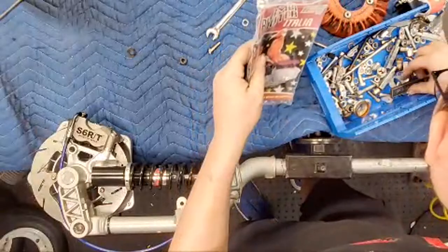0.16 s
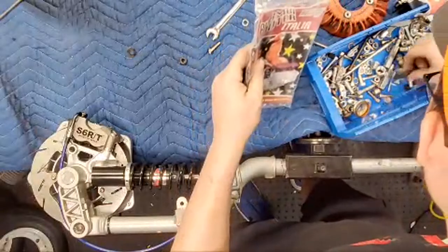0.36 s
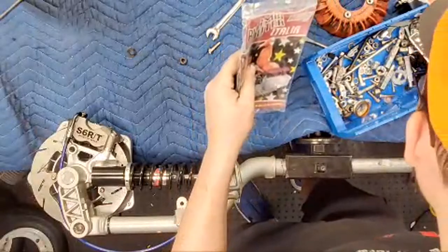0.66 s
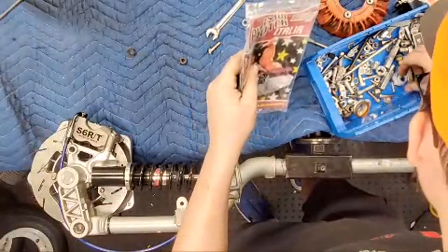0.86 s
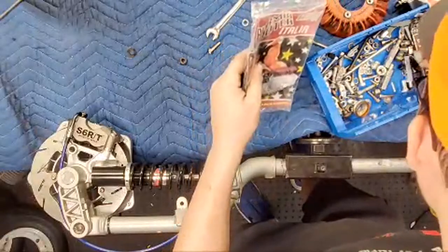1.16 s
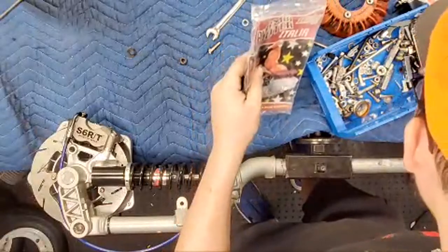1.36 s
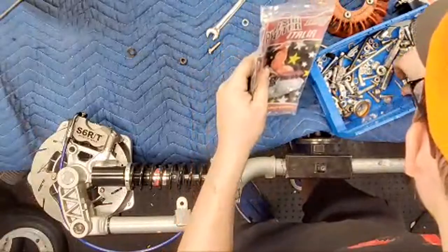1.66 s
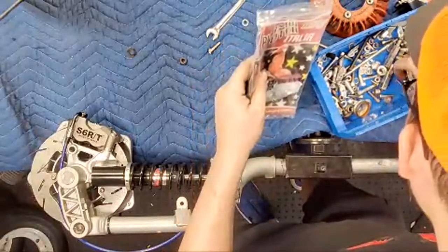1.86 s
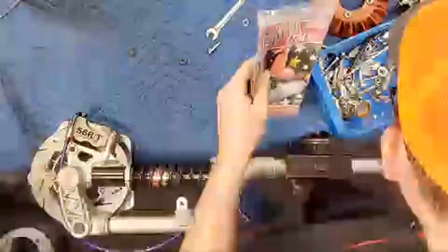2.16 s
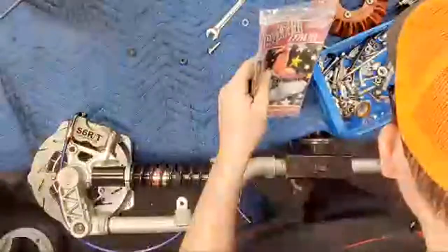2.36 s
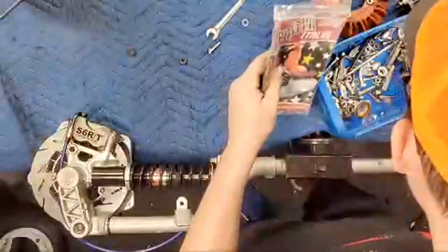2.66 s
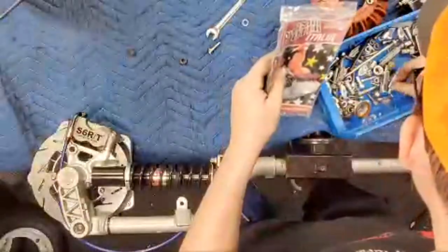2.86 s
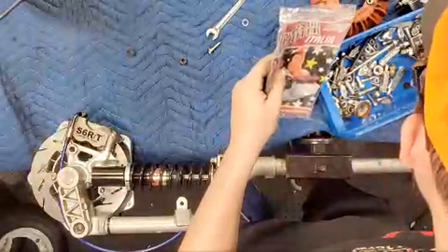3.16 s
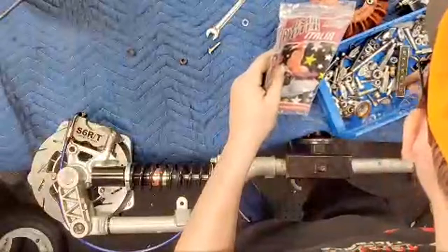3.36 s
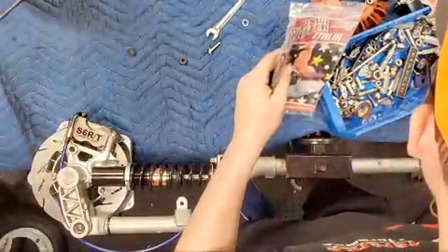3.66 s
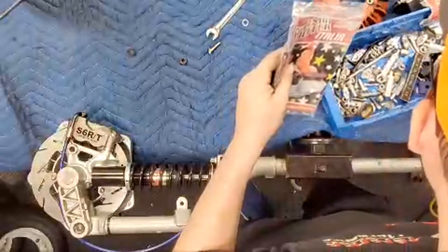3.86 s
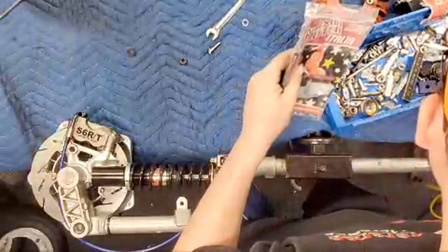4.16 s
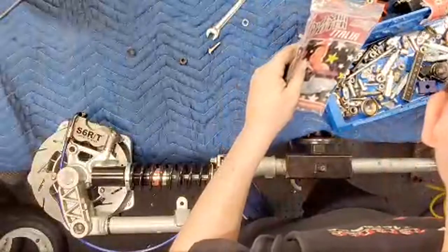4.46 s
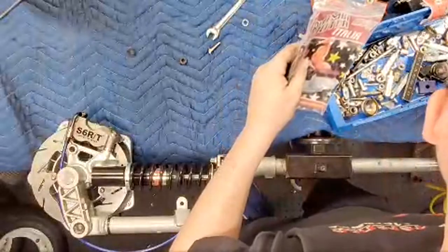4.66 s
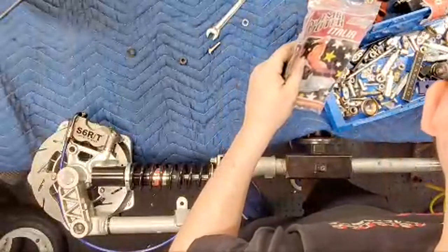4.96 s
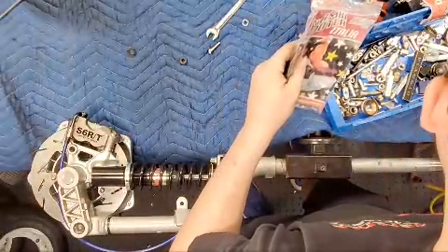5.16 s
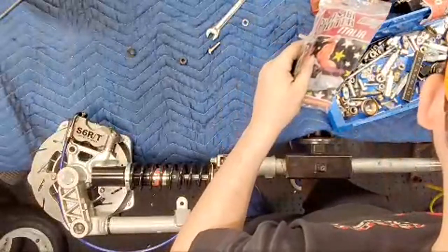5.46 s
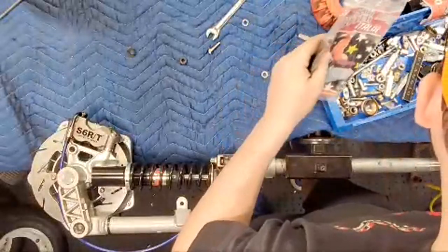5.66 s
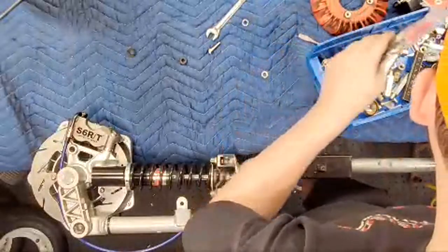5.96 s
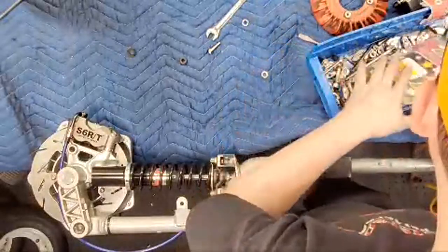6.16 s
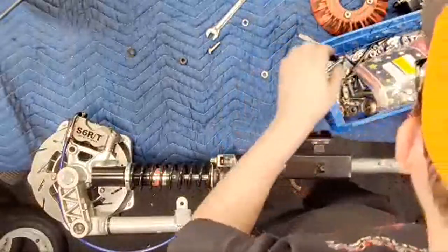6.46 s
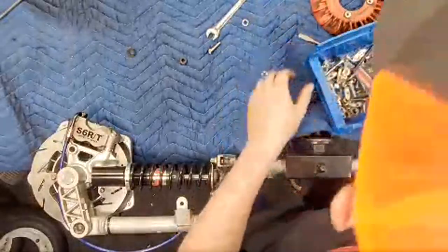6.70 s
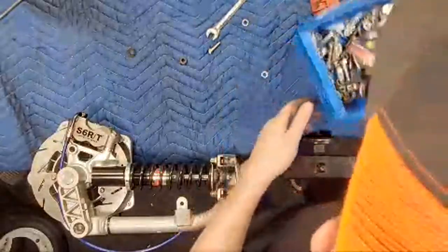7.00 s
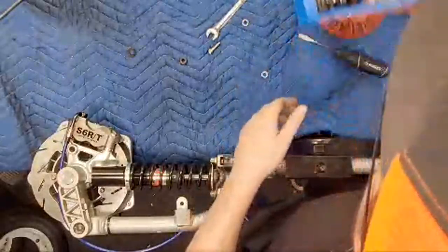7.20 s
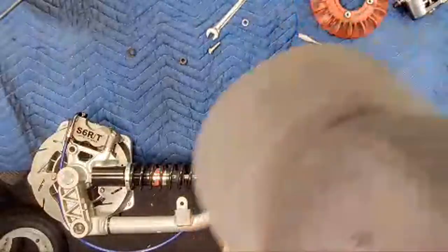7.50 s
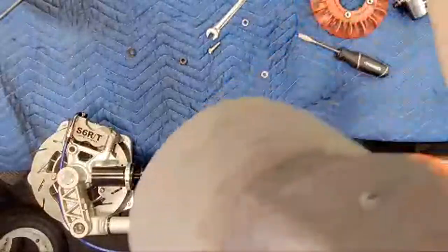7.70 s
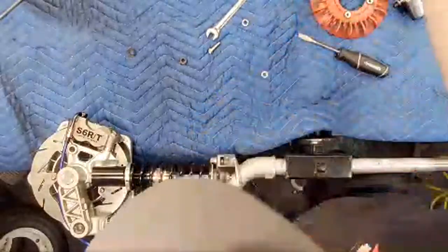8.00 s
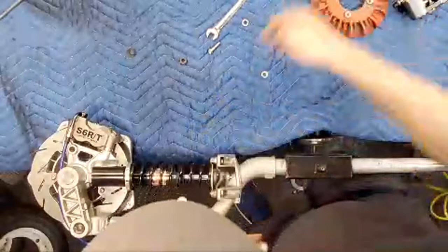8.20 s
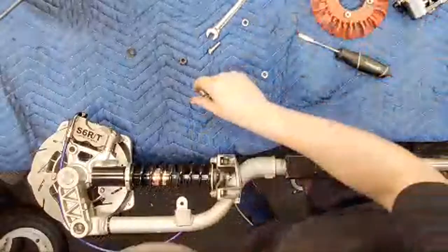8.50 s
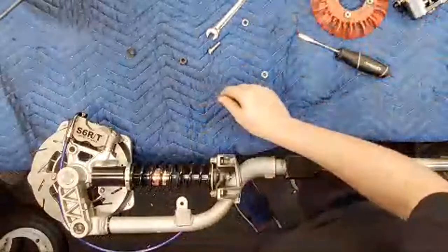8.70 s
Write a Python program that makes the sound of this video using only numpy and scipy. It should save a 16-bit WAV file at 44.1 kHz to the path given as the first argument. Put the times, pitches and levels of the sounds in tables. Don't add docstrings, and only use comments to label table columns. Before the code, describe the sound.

Close, dry sound of small steel hardware in a plastic tray on a padded bench, with faint low machine hum behind. A slide of parts starts, then fades sharply to silence at 0.3 s and snaps back near 0.6. Quick knocks and clinks cluster until 1.5, densest around 1.0-1.3. Digging follows from 1.7, with a hard jolt at 2.0 and strong clatter near 2.9. Raking is bright and busy at 3.1-3.3, with another heavy knock at 3.75 and a thin ring at 4.0. From 4.4 to 6.0 only soft ticks and light shuffles remain. A sharp clack lands at 6.13, then silence until 6.55; small rustles, another brief dropout around 7.0. From 7.4 the tray is moved: hollow, dense rattling grows from 7.7, with heavy jolts at 8.0 and 8.2, then falls quickly to quiet hum by 8.5, ending near 8.8.

```python
import sys
import numpy as np
from scipy import signal
from scipy.io import wavfile
from scipy.ndimage import uniform_filter1d

SR = 44100
rng = np.random.default_rng(int(sys.argv[2]) if len(sys.argv) > 2 else 0)


def gain_from_decibels(decibels):
    exponent = np.asarray(decibels, float) / 20
    return 10 ** exponent


def wrap_up_sound(samples):
    columns = np.atleast_2d(samples).T
    tamed = np.clip(columns, -1, 1)
    steps = np.round(tamed * 32767).astype(np.int16)
    wavfile.write(sys.argv[1], SR, steps)


N = 389844


def evened(x):
    return x / np.sqrt(np.mean(x ** 2) + 1e-20)


def read(points, hz):
    f, value = np.transpose(points)
    return np.interp(np.log(hz + 1), np.log(f + 1), value)


def add(mix, start_s, sound):
    part = mix[round(start_s * SR):][:len(sound)]
    part += sound[:len(part)]


def causal(gain):
    log = np.log(np.maximum(np.r_[gain, gain[-2:0:-1]], 1e-5))
    return np.fft.ifft(np.exp(log - 1j * signal.hilbert(log).imag)).real[:1024]


# pitch_hz, level_db (per Hz)
COLOUR = [(88, -45.5), (150, -15.5), (231, -3.5), (271, -19), (304, 2.5), (451, -1.5), (783, -4),
          (864, -14), (1280, -5), (4330, -18), (11400, -32.5), (15300, -35.5), (16500, -38)]
# low_hz, high_hz
BANDS_HZ = [(360, 1500), (1500, 5000), (5000, 30000)]


def voices():
    hz = np.fft.rfftfreq(2048, 1 / SR)
    gain = gain_from_decibels(read(COLOUR, hz))
    responses = []
    for low_hz, high_hz in BANDS_HZ:
        loss = np.sqrt((1 + (low_hz / (hz + 1)) ** 8) * (1 + (hz / high_hz) ** 8))
        response = causal(gain / loss)
        responses.append(response / np.linalg.norm(response))
    return responses


def impacts(count, per_s, spread_db):
    chance, size, sign = rng.random((count, 3)).T
    height = gain_from_decibels(-spread_db * np.log(np.maximum(size, .01)))
    return (chance < per_s / SR) * np.sign(sign - .5) * height


def mode(hz, t60_s, phase=0):
    t = np.arange(2000) / SR
    return gain_from_decibels(-60 * t / t60_s) * np.sin(2 * np.pi * (hz * t + phase))


def steel(count, low_hz, spread):
    pitch, life, phase = rng.random((count, 3, 1)).transpose(1, 0, 2)
    chink = mode(low_hz * spread ** pitch, .006 + .02 * life, phase).sum(0)
    return chink / np.linalg.norm(chink)


def layer_levels(thud_db, bright_db, clatter_db):
    return np.array([thud_db, thud_db + clatter_db + 0.56 * bright_db, thud_db + bright_db])


# start_s, tray_thud_db, brightness_db, tray_pitch_hz, clink_pitch_hz
PICKING = [(0.001, -21.5, -28.5, 640, 2020), (0.195, -30.5, -4, 764, 1930), (0.582, -25.5, -17, 584, 1950),
           (0.622, -26, -28, 550, 1590), (0.647, -33, -15, 1330, 2200), (0.718, -47, 15, 1340, 3030),
           (0.819, -36.5, -9.5, 1480, 2900), (0.927, -22, -17, 1370, 1600), (0.943, -29, 4, 740, 3300),
           (0.976, -32.5, 2, 579, 2950), (1.02, -15, -20, 1160, 2720), (1.061, -16.5, -9.5, 1020, 2020),
           (1.111, -10, -24, 610, 2270), (1.141, -14, -21, 1500, 1640), (1.161, -15.5, -14.5, 550, 1910),
           (1.198, -31, -23, 1270, 1970), (1.247, -27, -20, 1160, 1540), (1.28, -26, -13.5, 800, 1600),
           (1.301, -11.5, -31.5, 627, 2940), (1.349, -22.5, -14.5, 1440, 1870),
           (1.493, -29.5, -14, 1180, 1980)]
DIGGING = [(1.67, -28, -30, 740, 1760), (1.731, -40, -7.5, 762, 1790), (1.813, -29, -20, 413, 1600),
           (1.883, -24, -32.5, 1270, 1640), (1.926, -23.5, -25, 1310, 1880), (1.96, -39, 1, 1530, 1780),
           (2.015, -5.5, -11, 630, 2720), (2.171, -17, -22, 830, 2440), (2.205, -31, -18, 1200, 1650),
           (2.236, -29, -50, 1320, 1770), (2.296, -44, -7, 724, 3650), (2.422, -13.5, -19.5, 1393, 1580),
           (2.483, -21.5, -27.5, 1190, 1690), (2.511, -25.5, -10.5, 860, 2930),
           (2.544, -30, -45.5, 1480, 1690), (2.616, -24, -14, 550, 1930), (2.681, -31.5, 0, 730, 2030),
           (2.706, -22.5, -16.5, 1330, 2180), (2.751, -26, -23, 1280, 2430),
           (2.767, -21, -26.5, 1250, 2320), (2.795, -13, -15.5, 1100, 1750), (2.853, -22, -4.5, 594, 3440),
           (2.884, -4.5, -24, 414, 2340), (2.941, -19, -25, 590, 2400)]
RAKING = [(3.076, -40.5, -9, 455, 2500), (3.161, -13, -8.5, 780, 3470), (3.196, -19, -5.5, 424, 2940),
          (3.23, -11.5, -16.5, 594, 3660), (3.245, -16, -5, 527, 4570), (3.31, -23, -20.5, 620, 1887),
          (3.558, -30.5, -12, 571, 2160), (3.611, -27, -7.5, 330, 1700), (3.671, -39.5, 5.5, 1406, 2530),
          (3.749, -3.5, -17.5, 585, 2170), (3.791, -19.5, -10, 746, 1930), (3.813, -8, -4, 427, 3390),
          (3.824, -7, -3, 950, 4340), (3.918, -28, -7, 1000, 2190), (3.98, -34, -5, 1270, 3220)]
SORTING = [(4.428, -40.5, -4, 1300, 1680), (4.55, -42, 11.5, 660, 3280), (4.692, -42.5, -4, 560, 2140),
           (4.734, -32, -18.5, 627, 1930), (4.842, -33, -36, 1290, 1840), (5.146, -44, -0.5, 1240, 3530),
           (5.245, -33, 7, 1450, 3520), (5.299, -27, -45, 1300, 1660), (5.328, -36, 0.5, 1320, 3850),
           (5.388, -46, 11, 1390, 3420), (5.414, -32, -10, 725, 2000), (5.672, -32.5, -46, 660, 1700),
           (6.023, -59, 15.5, 450, 1850), (6.064, -47.5, 7.5, 750, 2620), (6.076, -47.5, 13.5, 900, 3510)]
CARRYING = [(6.138, -17.5, -12, 1060, 3410), (6.599, -34, -11.5, 1400, 2120),
            (6.819, -25.5, -22.5, 630, 3420), (6.912, -21, -17.5, 1074, 1860),
            (7.437, -28.5, -0.5, 640, 1750), (7.493, -24, -15.5, 530, 1780), (7.549, -21.5, -8, 448, 3530),
            (7.731, -24.5, -8.5, 439, 2050), (7.862, -15.5, -9, 448, 1980), (7.884, -17, -10.5, 410, 2000),
            (8.012, -4.5, -16.5, 1375, 1780), (8.032, -9, -7, 410, 2240), (8.149, -19.5, -12, 570, 1960),
            (8.218, -9.5, -4, 571, 2290), (8.519, -45.5, -5, 1900, 4900)]
# start_s, tray_thud_db,
# brightness_db, tray_pitch_hz, clink_pitch_hz
REBOUNDS = [(.596, -24.5, -19, 700, 1850), (0.628, -23.5, -10, 1300, 3400), (0.662, -32, -11, 1400, 3100),
            (0.708, -32, -13, 1300, 2000), (.796, -50, -6, 1400, 3030), (0.84, -39, -10, 1400, 1890),
            (.894, -62, -14, 1450, 2996), (0.986, -42, -5, 1500, 3050), (1.029, -13.5, -32, 1390, 1600),
            (1.084, -31, -6, 1300, 1890), (1.099, -28, -19, 1090, 2230), (1.15, -17.5, -14.5, 1300, 1670),
            (1.204, -27, -17, 1300, 2900), (1.238, -29, -28, 1220, 1700), (1.265, -25, -23, 920, 1600),
            (1.306, -30, -4, 685, 2100), (1.381, -40, -24, 1100, 1520), (2.813, -20, -6.5, 800, 3900),
            (2.827, -18, -14, 800, 3620), (2.879, -28, -32, 560, 1700), (2.9, -20.5, -9, 520, 2520),
            (6.127, -18, -7.5, 1040, 2240), (6.123, -24, -10, 1056, 2000), (7.709, -29, -11, 1280, 2000),
            (7.753, -23, -6.5, 500, 1900), (7.86, -24, -9, 460, 1900), (7.877, -17, -24, 480, 4300),
            (7.918, -18, -22, 500, 1190), (7.977, -30.5, -20, 1120, 2000), (8.004, -22, -17.5, 700, 1400),
            (8.077, -8, -28, 566, 1480), (8.2, -25.5, -0.5, 400, 1870), (8.209, -23, -15.5, 503, 2200),
            (8.47, -49, -7.5, 900, 2000), (8.615, -60.5, -9, 1200, 1780),
            (.179, -34.5, -15.5, 900, 1900), (3.594, -26.5, -19, 650, 1900), (3.645, -25.5, -26, 330.4, 1900),
         (3.689, -23, -17, 342, 2000), (3.758, -11, -15.5, 597, 1900), (4.386, -56, 2.5, 1400, 3200),
         (4.455, -53.5, 9.5, 1404, 3500), (6.168, -32.5, -9, 900, 3220), (.59, -27.5, -11, 1300, 2500),
         (2.043, -29, -8, 700, 4500), (2.082, -30, -27, 1300, 2400), (2.228, -35, -23, 1100, 2000),
         (2.241, -37, -17, 1200, 3500), (2.418, -31.5, -18.5, 1300, 2900),
         (2.477, -27.5, -20.5, 1404, 2900), (2.56, -39.5, -26, 1300, 2000), (2.574, -40, -22.5, 1200, 3000),
         (2.654, -39, -14.5, 1190, 3500), (2.67, -31, -19, 1300, 2500), (3.156, -39.5, -11.5, 1100, 3500),
         (3.186, -20.5, -12, 700, 1500), (3.203, -13.5, -7.5, 597, 4300), (3.228, -17, -10, 705, 3400),
         (3.254, -6, -10, 562, 1500), (3.26, -21, -12.5, 900, 2500), (3.272, -20.5, -15.5, 600, 2800),
         (3.33, -31.5, -19, 704, 1500), (7.77, -16.5, -12.5, 1475, 1900), (7.8, -27, -21, 518, 1900),
         (7.82, -27.5, -19.5, 520, 2100), (7.835, -14.5, -20, 503, 2200), (7.998, -17.5, -33.5, 300, 1600),
         (8.295, -16, -18, 500, 2000), (.646, -30.5, -13, 700, 2600), (.987, -43, -4, 1600, 3060),
         (4.636, -41.5, -5, 1600, 2000), (4.654, -40.5, -10, 1500, 2200), (4.766, -37.5, -11, 650, 1800),
         (8.718, -70, 6.5, 1500, 4800)]
# start_s, level_db
TICKS = [
    (4.363, -55),
    (6.7496, -44),
    (7.1612, -51),
    (7.244, -53),
]


def knock(levels_db, tray_hz, clink_hz, responses, longest_s):
    thud_db, clatter_db, fizz_db = levels_db
    t = np.arange(5000) / SR
    t60_s = np.clip(0.042 + 0.00016 * clatter_db, .01, longest_s)
    blows = impacts(len(t), 1800, 4.04) * np.minimum(t / 0.0052, 1) * gain_from_decibels(-60 * (t / t60_s) ** 1.57)
    rubbed = blows.copy()
    blows[90] += 3.5
    rubbed[90] += 1.5
    tones = [mode(tray_hz, .018), mode(clink_hz, .013), steel(count=14, low_hz=4500, spread=3.0)]
    strikes = [blows, blows, rubbed] * 2
    layers = [signal.fftconvolve(b[:2600], r)[:3600] for b, r in zip(strikes, responses + tones)]
    layers = [x / np.sqrt(uniform_filter1d(x ** 2, 200).max()) for x in layers]
    thud, clatter, fizz, tone, clink, chink = layers
    tray = gain_from_decibels(thud_db - 2) * (gain_from_decibels(-4) * thud + gain_from_decibels(-9.5) * tone)
    parts = gain_from_decibels(clatter_db) * (gain_from_decibels(-8) * clatter + gain_from_decibels(-11.0) * clink)
    whole = tray + parts + gain_from_decibels(fizz_db + 3.5) * (gain_from_decibels(-7.0) * fizz + gain_from_decibels(-13.5) * chink)
    return signal.lfilter(*signal.butter(4, .72 * tray_hz, "high", fs=SR), whole)


# peak_s, rise_s, fall_s, tray_rumble_db,
# brightness_db
STROKES = [(0.0, 0.023, 0.18, -39, -5), (0.284, 0.11, 0.69, -19.5, -14.5), (.6, 0.024, 0.14, -29, -12.5),
           (.725, 0.11, 0.055, -37.5, -4.5), (1.1, 0.15, 0.37, -30.5, -14.5),
           (1.941, 0.098, 0.056, -29.5, -13.5), (2.039, 0.069, 0.29, -28.5, -11.5),
           (2.78, 0.028, 0.049, -27, -13.5), (2.691, 0.077, 0.077, -34.5, -11),
           (2.861, 0.14, 0.18, -18.5, -12.5), (3.241, 0.15, 0.16, -17, -10.5),
           (3.67, 0.32, 0.29, -39, -0.5), (3.832, 0.23, 0.18, -18.5, -13.5), (4.565, 0.19, 0.18, -41, 4),
           (4.751, 0.088, 0.22, -42, -12.5), (5.259, 0.052, 0.32, -38.5, -1.5),
           (5.599, 0.13, 0.23, -45.5, 3.5), (6.171, 0.17, 0.53, -40, 2), (6.569, 0.068, 0.18, -42.5, -8),
           (6.83, 0.14, 0.23, -39, 2.5), (7.4, 0.15, 0.31, -31, -6), (7.559, 0.29, 0.11, -32, -16),
           (7.86, 0.26, 0.29, -23.5, -9), (8.046, 0.065, 0.15, -19, -3), (8.236, 0.082, 0.19, -17, -7),
           (.1, 0.29, 0.15, -61, 1), (.87, 0.14, 0.34, -49, -0.5), (1.42, 0.036, 1, -51.5, -16),
          (2.2, 0.032, 0.11, -39.5, -12), (2.44, 0.043, 0.37, -42, -16), (3.1, 0.08, 0.1, -37, -8.5),
          (3.54, 0.017, 0.69, -39.5, -5.5), (4.0, 0.06, 1, -64.5, 8.5), (7.08, 0.1, 0.15, -51, -5.5),
          (7.31, 0.027, 0.66, -38.5, -4), (7.752, 0.052, 0.18, -23.5, -7.5),
          (8.101, 0.082, 0.027, -20, -16), (8.42, 1, 0.22, -54.5, 6)]


def motion(knocks):
    edge_db, edge_bend = 35, 1.102
    settle_db, settle_rise_s, settle_fall_s = -11.5, 0.0023, 0.053
    stir_db, stir_bright_db, stir_ends_s = -56, -16.5, 8.4
    slide_clatter_db = 2.5
    t = np.arange(0, N / SR + .004, .002)
    settling = [(s + settle_rise_s, settle_rise_s, settle_fall_s, db + settle_db, bright)
                for s, db, bright, *_ in knocks]
    peak, rise, fall, db, bright = np.transpose(STROKES + settling)[:, :, None]
    away = np.maximum((peak - t) / abs(rise), (t - peak) / abs(fall))
    levels = layer_levels(db, bright, slide_clatter_db) - edge_db * away ** edge_bend
    power = gain_from_decibels(2 * levels).sum(1)
    stir = gain_from_decibels(2 * layer_levels(stir_db, stir_bright_db, slide_clatter_db))
    power += stir[:, None] * np.where(t < stir_ends_s, 1, 0.06)
    return [np.interp(np.arange(N) / SR, t, np.sqrt(p)) for p in power]


# pitch_hz, t60_s, level_db
HOLLOW = [(500, 0.0088, -1.5), (700, 0.008, -7), (1250, 0.0099, -5), (1600, 0.01, -2), (2000, 0.011, -6.5)]


def slide(gains, responses):
    lift_s = 7.7
    t = np.arange(N) / SR
    clumps = gain_from_decibels(2.1 * evened(uniform_filter1d(uniform_filter1d(rng.standard_normal(N), 200), 200)))
    grains = evened(impacts(N, 4000, 2.9)) + 0.79 * evened(impacts(N, 500, 2.9))
    blows = (grains + 0.82 * rng.standard_normal(N)) * clumps
    layers = [evened(signal.oaconvolve(blows, r)[:N]) for r in responses]
    for band, low_hz, spread, db in (0, 501, 3.2, -7.5), (1, 1360, 3.2, -7), (2, 4550, 2.5, -10):
        chinks = np.zeros(N)
        for _ in range(8):
            part = steel(count=3, low_hz=low_hz, spread=spread)
            chinks += signal.oaconvolve(impacts(N, 40, 3.5), part)[:N]
        layers[band] = layers[band] + gain_from_decibels(db) * evened(chinks)
    hollow = sum(gain_from_decibels(db) * evened(signal.oaconvolve(blows, mode(hz, t60))[:N]) for hz, t60, db in HOLLOW)
    hollow = signal.sosfilt(signal.butter(4, 320, "high", fs=SR, output="sos"), hollow)
    padded = signal.lfilter(*signal.butter(2, 440, "high", fs=SR), layers[0])
    layers[0] = np.where(t > lift_s, 0.42 * layers[0] + hollow, padded)
    muffled = signal.sosfilt(signal.butter(6, 2400, "low", fs=SR, output="sos"), layers[1])
    gripped = (t > lift_s) & (t < lift_s + .28)
    layers[1] = np.where(gripped, 0.64 * muffled + 0.15 * layers[1], layers[1])
    return gain_from_decibels(-2.0) * sum(g * x for g, x in zip(gains, layers))


def sizzle(x):
    top = signal.sosfiltfilt(signal.butter(3, 11800, "high", fs=SR, output="sos"), x)
    force = np.sqrt(abs(uniform_filter1d(top ** 2, 1800)))
    return x + gain_from_decibels(13.0) * np.sqrt(force) * top


# pitch_hz, t60_s
SHOP = [(250, 0.037), (1000, 0.35), (4000, 0.59), (12000, 0.19)]


def shop(x):
    taps = np.zeros(SR // 2)
    at = np.arange(200, len(taps) - 20, 20)
    taps[at + rng.integers(0, 20, len(at))] = rng.choice([-1., 1.], len(at))
    hz, t, z = signal.stft(taps, SR, nperseg=256)
    decay = gain_from_decibels(-60 * t / read(SHOP, hz)[:, None])
    tail = signal.istft(z * decay, SR, nperseg=256)[1]
    return signal.fftconvolve(x, tail / np.linalg.norm(tail))[:N]


# start_s, level_db
HUM = [(0, -41.5), (3.003, -44.5), (6.001, -43.5), (8.302, -42.5), (8.84, -52.5)]
# pitch_hz, level_db (per Hz)
AIR = [(15, -48.5), (25, -29), (64, 0), (114, -5), (236, -6), (489, -14.5), (591, -24), (1070, -21),
       (1290, -23.5), (2050, -45), (6560, -35), (16000, -56.5)]
# pitch_hz, width_hz, level_db
DRONE = [(74.6, 3.1, -49), (151, 55, -56.5), (228.94, 7.1, -45.5), (1330, 41, -64)]


def hum():
    frames, hz = N // 1024 + 5, np.fft.rfftfreq(4096, 1 / SR)
    a, b = rng.standard_normal((frames, len(hz), 2)).T
    tones = sum(gain_from_decibels(db + 59.5) / (1 + (2 * (hz - f) / width) ** 2) for f, width, db in DRONE)
    z = (a + 1j * b) * (gain_from_decibels(read(AIR, hz)) * (1 + 1.4 * tones))[:, None]
    noise = signal.istft(z, nperseg=4096, noverlap=3072)[1][:N]
    s, db = np.transpose(HUM)
    return gain_from_decibels(np.interp(np.arange(N) / SR, s, db)) * evened(noise)


# pitch_hz, level_db, t60_s
BOLT = [(3321, -1, .36), (8977, -13, .3), (10585, -2, .36), (11370, -12, .15)]
WASHER = [(7843, 0, .75), (8161, -5, .45), (8059, -17, .5)]
NUT = [(7768, 0, .7), (8231, -6, .55)]
SPACER = [(8398, 0, .19), (11920, -21, .1), (15700, -15, .2)]
ROD = [(3146, 0, 1.5)]
PIN = [(7480, 0, .15)]
STUD = [(5950, 0, .08)]
SLEEVE = [(10480, 0, .12), (6800, -4, .12)]
CAP = [(10890, 0, .3), (9711, -12, .13)]
CLIP_RING = [(8500, 0, .04), (6950, -1, .04), (5000, -9, .03)]
SHIM = [(8200, 0, .12)]
WALL = [(445, 0, .05), (620, -8, .03)]
PANEL = [(1000, 0, .05), (2060, -5, .025)]
RIVET = [(10480, 0, .12), (8550, -5, .1)]
# start_s, level_db, free_s, piece
RINGS = [(.283, -35, 0.011, SPACER), (0.946, -32, 0.042, SLEEVE), (1.063, -29, .006, SPACER),
         (1.072, -26.5, 0.0087, CLIP_RING), (1.086, -30.5, 0.0071, CLIP_RING), (2.105, -36, 0.15, SPACER),
         (2.855, -25, 0.0054, SHIM), (2.873, -28, 0.011, SHIM), (2.95, -45, .05, SHIM),
         (3.197, -26.5, 0.022, SHIM), (3.75, -28.5, .045, RIVET), (3.981, -45, 0.046, ROD),
         (3.984, -28.5, .3, CAP), (3.985, -40.5, 0.48, WASHER), (3.986, -37.5, 0.39, BOLT),
         (6.129, -1, 0.0036, PANEL), (6.1335, -5, 0.0017, PANEL), (6.168, -39, 0.035, NUT),
         (6.551, -45, 0.18, NUT), (7.302, -49, 0.041, CAP), (7.439, -37.5, 0.017, CAP),
         (7.44, -33, 0.025, WASHER), (7.77, -32, 0.04, SPACER), (7.771, -27.5, 0.02, PIN),
         (7.834, -16, 0.012, STUD), (7.862, -2, 0.0056, WALL), (7.877, -10, 0.0069, WALL),
         (2.885, -2.5, 0.008, WALL), (2.856, -12, .01, WALL), (2.498, -51, 0.026, SPACER),
         (8.07, -26.5, 0.043, PIN), (8.24, -31, .4, BOLT), (8.385, -48, .5, ROD), (1.449, -50, .05, SPACER),
         (1.724, -52, 0.015, SPACER)]


def ring(db, free_s, modes):
    t = np.arange(round((free_s + 0.035) * SR)) / SR
    tone = np.zeros(len(t))
    for hz, mode_db, t60_s in modes:
        wobble = uniform_filter1d(uniform_filter1d(rng.standard_normal(len(t)), 350), 350)
        rock = gain_from_decibels(2.8 * evened(wobble))
        tone += rock * gain_from_decibels(mode_db - 60 * t / t60_s) * np.sin(2 * np.pi * hz * t)
    rise_s = 0.00053
    if modes in (PIN, STUD, ROD):
        rise_s = 0.0067
    elif modes == WALL:
        rise_s = .002
    return gain_from_decibels(db - 520 * np.maximum(t - free_s, 0)) * tone * np.minimum(t / rise_s, 1)


# start_s, length_s, level_db, pitch_hz
CHATTER = [(0.661, 0.043, -53, 4950), (0.802, 0.14, -56, 3050), (2.805, .11, -44, 15600),
           (4.821, 0.35, -67, 2820), (2.028, 0.19, -55, 15800), (4.805, 0.4, -62.5, 1330),
           (7.732, 0.19, -47, 5240)]


def chatter(length_s, db, hz):
    taps = impacts(round(length_s * SR), 230, 2.4)
    return gain_from_decibels(db) * evened(signal.fftconvolve(taps, mode(hz, .025)))


# start_s, level_db
THUMPS = [
    (1.999, -23.5),
    (2.872, -49),
    (3.75, -20.5),
    (7.861, -25.5),
    (7.999, -18.5),
    (8.215, -16),
]


def thump(db):
    t = np.arange(9000) / SR
    rumble = signal.lfilter(*signal.butter(2, [130, 300], "band", fs=SR), rng.standard_normal(len(t)))
    return gain_from_decibels(db - 60 * t / 0.22) * evened(rumble) * np.minimum(t / 0.029, 1)


# start_s, fall_db_per_s, back_on_s
FADES = [
    (.3, 375, .581),
    (6.178, 420, 6.548),
    (6.948, 450, 7.046),
]


def faded(x):
    t, fade_db = np.arange(N) / SR, np.zeros(N)
    for start_s, fall_db, back_s in FADES:
        fade_db -= fall_db * np.maximum(t - start_s, 0) * (t < back_s)
    return x * uniform_filter1d(gain_from_decibels(fade_db), 60)


def scene():
    responses, parts = voices(), np.zeros(N)
    knocks = PICKING + DIGGING + RAKING + SORTING + CARRYING
    knocks = knocks + [(s, db - 2.5, 0.5, 900, 3300) for s, db in TICKS]
    rebounds = REBOUNDS
    longest = [.15] * len(knocks) + [0.03] * len(rebounds)
    for (s, db, bright_db, tray_hz, clink_hz), longest_s in zip(knocks + rebounds, longest):
        levels_db = layer_levels(db, bright_db, 6.5)
        add(parts, s, knock(levels_db, tray_hz, clink_hz, responses, longest_s))
    bed = slide(motion(knocks), responses)
    for s, *row in RINGS:
        add(parts, s, ring(*row))
    for s, *row in CHATTER:
        add(parts, s, chatter(*row))
    for s, db in THUMPS:
        add(parts, s, thump(db))
    return (sizzle(parts + bed) + gain_from_decibels(-20) * shop(parts) + hum())[None]


def top_cut(x):
    return signal.sosfilt(signal.butter(12, 16650, fs=SR, output="sos"), x)


def record(dry):
    thinned = signal.lfilter(*signal.butter(3, 55, "high", fs=SR), np.tanh(dry))
    mix = faded(thinned) - .0002
    mix = signal.oaconvolve(mix, signal.firwin(255, 16100, fs=SR)[None], "same")
    return top_cut(mix)


dry = scene()
out = record(dry)
wrap_up_sound(out)
```